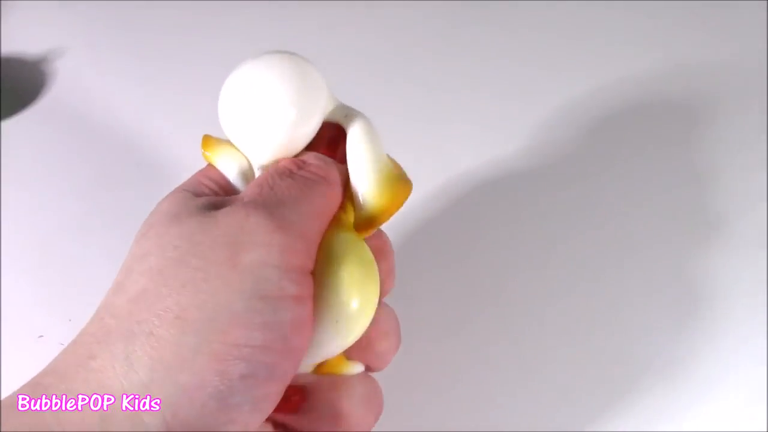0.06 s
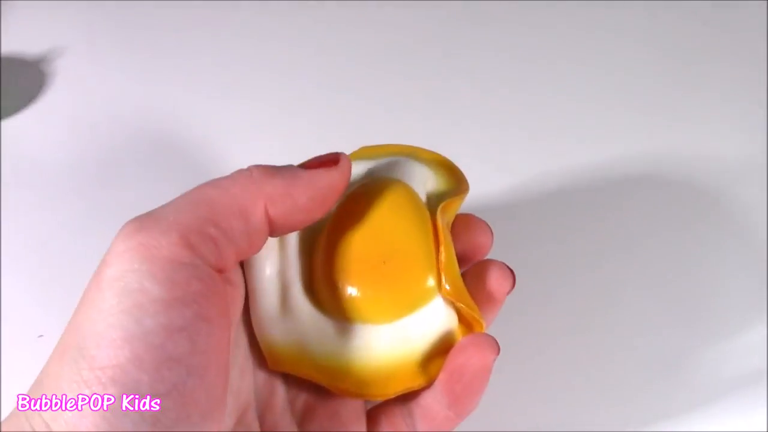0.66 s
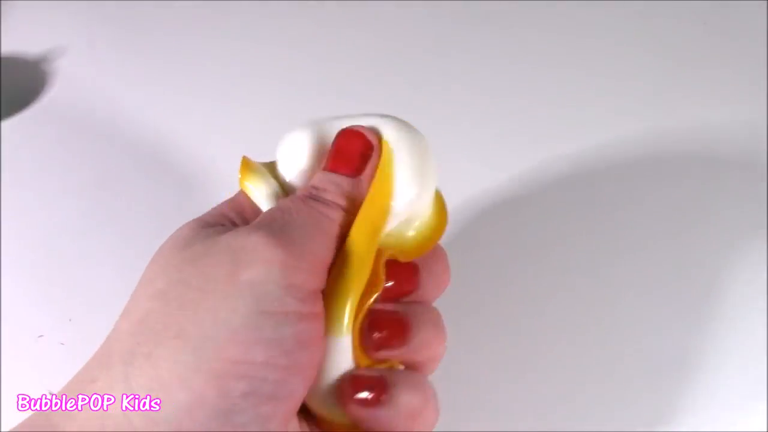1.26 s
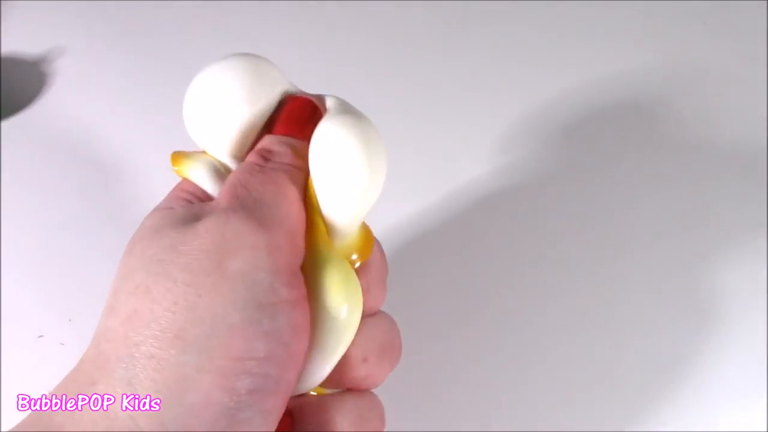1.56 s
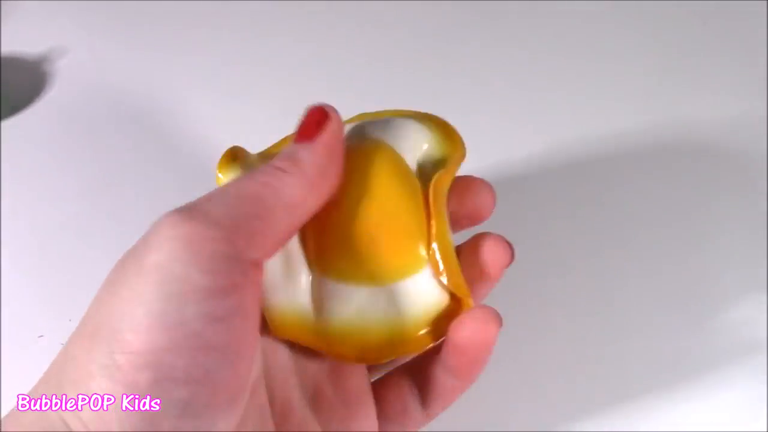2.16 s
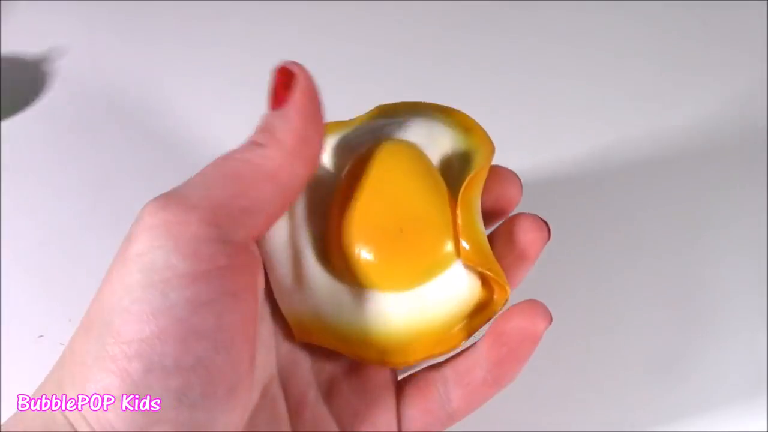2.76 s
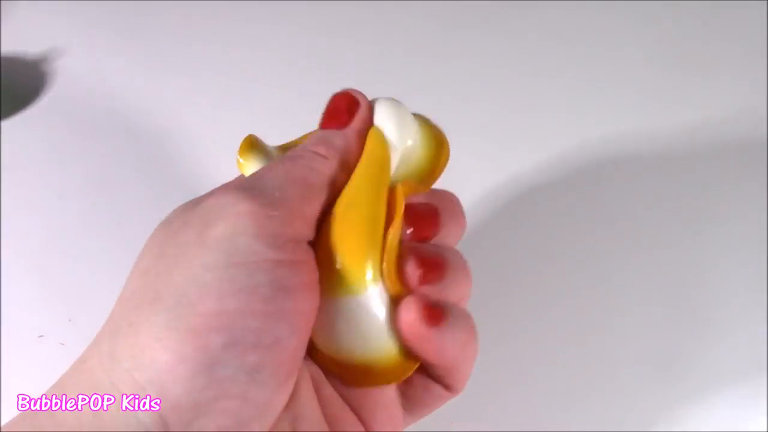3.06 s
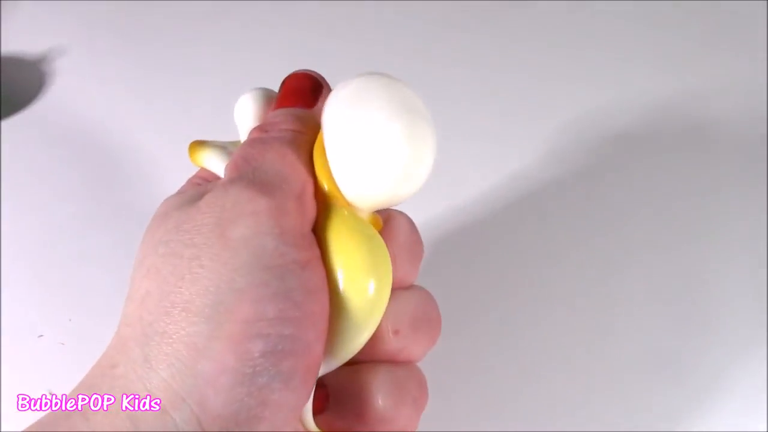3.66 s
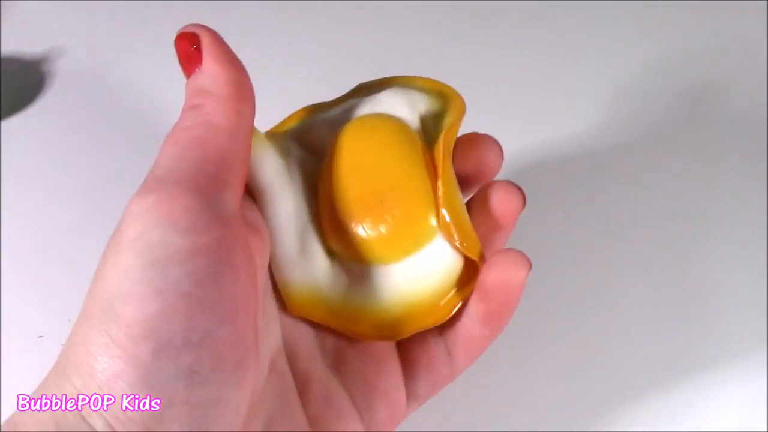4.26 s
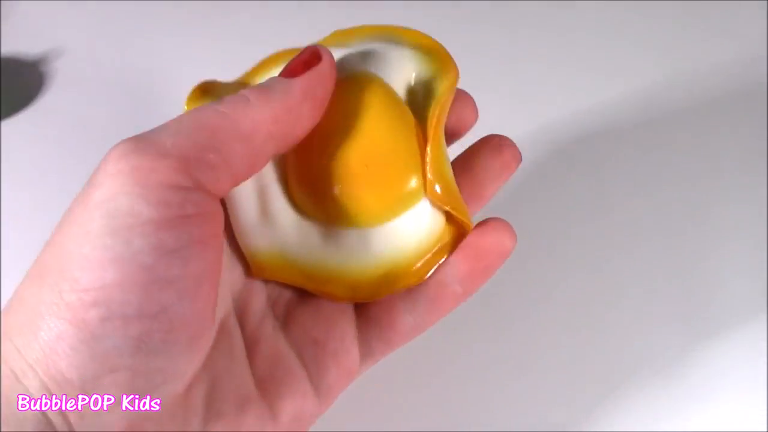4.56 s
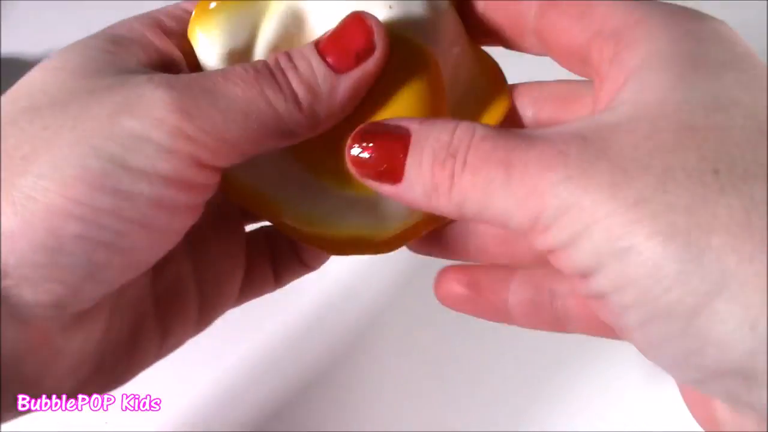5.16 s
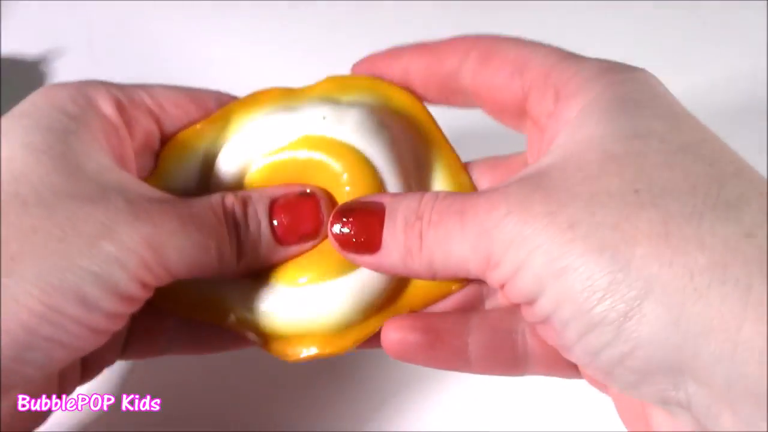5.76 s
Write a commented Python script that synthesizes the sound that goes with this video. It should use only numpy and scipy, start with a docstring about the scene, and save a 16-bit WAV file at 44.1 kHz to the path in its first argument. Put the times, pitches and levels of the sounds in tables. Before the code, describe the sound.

A hand squeezes a soft, goo-filled rubber toy close to the microphone in a small, lively room. It gives three short wet plops as the goo pushes into bulges, and two louder wet slaps as it springs back after the second and third squeezes. In between, the tacky rubber ticks and rubs faintly against the fingers. It ends with light sticky clicks and tiny bubble blips over quiet room tone.

```python
"""A small, live room: a goo-filled rubber toy is squeezed and let go by hand over a table.
On each squeeze the goo plops through into bulges of the skin; on release they slap back with a wet thud.
In between, the tacky rubber ticks and rubs against the fingers, creases crinkle, air bubbles blip
and goo fizzes faintly into a bulge. Dull hand rumble and a quiet room tone lie underneath."""
import sys
import numpy as np
from scipy import signal
from scipy.fft import rfft, irfft
from scipy.io import wavfile

SR = 44100
rng = np.random.default_rng(int(sys.argv[2]) if len(sys.argv) > 2 else 0)


def waveform_to_disk(signal):
    """Save audio, clipped to [-1, 1], as 16-bit WAV at the path in sys.argv[1]."""
    frames = np.transpose(np.atleast_2d(signal))
    scaled = np.clip(frames, -1, 1) * 32767
    samples = np.round(scaled).astype(np.int16)
    wavfile.write(sys.argv[1], SR, samples)


N = 261194
TIME = np.arange(N) / SR

# goo popping through into the bulges, the bulges slapping back, and a few sharp cracks of skin peeling loose
# (near 1.98, 1.99 and 2.51 s): # start_s, pocket_hz, pocket_db, pocket_length_s, snap_hz, snap_db,
# snap_length_s, room_send_db
GOO_POPS = [ (0.092, 496, -11.5, 0.0026, 970, -12, 0.0014, -4.5),
            (0.1406, 230.6, 2, 0.0024, 1510, 2.5, 0.00016, -3.5),
            (1.222, 535, -33.5, 0.0052, 1318, -14, 0.0005, -2.5),
            (1.2350, 557, -19.5, 0.0092, 920, -19.5, 0.0014, -1),
            (1.274, 686, -18, 0.0036, 464, -28.5, 0.0032, -5.5),
            (1.9823, 3108, -14, 0.0017, 860, -10, 0.00051, 2),
            (1.9894, 4384, 0.52, 0.0016, 1320, -12, 0.0013, -5),
            (2.0022, 297, 6, 0.0019, 1088, 5, 0.00048, -0.5),
            (2.5106, 327, -30.5, 0.0052, 3560, -24.5, 0.00072, -2),
            (3.0991, 570, -15, 0.0035, 1414, -13, 0.0017, -4),
            (3.1323, 783, -11, 0.0062, 565, -23, 0.006, -7.5),
            (3.937, 326, 4.5, 0.0022, 830, -3.5, 0.0026, -4),
            (3.948, 230, 6, 0.0034, 740, 5.5, 0.00052, -5), (3.9583, 280, 8, 0.0011, 1400, -5, 0.0007, 0),
            (3.9812, 223, -9, 0.0046, 603, -20, 0.0032, -6), ]
# tacky skin peeling off the fingers: start_s, level_db, pitch_hz, edge_db (relative to the tick)
PEEL_TICKS = [ (0.0712, -27, 3920, -5), (0.0935, -26, 2240, 8), (0.338, -35.5, 1350, -16),
              (0.389, -44, 1280, -14), (0.4348, -53.5, 4600, 14), (0.645, -43, 3850, -2),
              (0.9438, -37.5, 3650, -7), (1.235, -37, 3730, 4.5), (1.474, -45, 4300, -3),
              (1.926, -35, 3560, -4), (1.955, -36.5, 1700, -5.5), (2.167, -20, 1630, -8),
              (2.553, -36.5, 4780, 2), (2.843, -39.5, 3646, -25.5), (3.0994, -27.5, 3890, -3),
              (3.9304, -20.5, 3690, 5), (4.072, -25, 1370, 2), (4.102, -36.5, 4800, 0),
              (4.1479, -27, 1700, -8), (4.3432, -27, 3800, -2), (4.5968, -39, 2040, -13),
              (4.685, -40, 5400, 5.5), (4.9896, -35, 4000, -6), (4.994, -26, 3510, -13.5),
              (5.0945, -41.5, 1818, -19.5), (5.158, -42, 3150, 4), (5.1615, -40.5, 1095, -1),
              (5.2135, -36, 1533, 5), (5.218, -38, 1700, 7.5), (5.325, -38, 4050, 2.5),
              (5.482, -40, 1884, 2), (5.49, -48, 1870, 2), ]
# creases of the skin unfolding: start_s, end_s, level_db
CREASE_STROKES = [(0.2, 0.397, -59.5), (0.7, 0.84, -69), (2.06, 2.22, -56.5), (4.002, 4.048, -47.5),
                  (4.075, 4.233, -59.5), (4.42, 4.722, -65.5), (5.04, 5.381, -68)]
# small air bubbles in the goo: start_s, relative_db, pitch_hz
AIR_BUBBLES = [(1.773, -49, 1030), (3.776, -51, 1083), (3.873, -35.5, 810), (4.244, -43.5, 1112),
               (4.577, -48, 1040), (5.245, -45.5, 1060), (5.779, -47.5, 1040)]
# rubber sliding on the hand as the grip loosens: start_s, end_s, relative_db
RUB_STROKES = [(0.03, 0.06, -50.5), (0.097, 0.125, -38.5), (1.9, 1.975, -44), (2.565, 2.61, -55),
               (3.895, 3.922, -43), (4.5, 4.64, -66), (4.885, 4.905, -55), (5.26, 5.32, -65.5)]
# tone of rubber on skin: frequency_hz, gain_db
RUB_EQ = [(200, -28), (550, -0.5), (1100, -4), (1750, 1.5), (2400, -9), (3300, 1), (4000, -0.5),
          (4900, -5.5), (5800, -11), (7000, -13), (9500, -29.5)]
# goo seeping under a held grip, dying away as the pressure evens out: start_s, end_s, level_db
SEEP_STROKES = [(1.4, 1.45, -58), (1.65, 1.68, -74.5), (3.3, 3.4, -71.5)]
# resonances of a bulge's neck: pitch_hz, width_hz, gain_db
NECK_MODES = [(1750, 410, 3), (3500, 600, 5.5), (4200, 830, -8.5)]
# early reflections off the table top and near walls: delay_s, gain_db
EARLY_ECHOES = [(.0023, -12.5), (.0058, -18.5), (.0081, -15), (0.0139, -13.5), (0.0335, -30.5)]
# diffuse reverb tail: frequency_hz, gain_db, t60_s
ROOM_TAIL = [(80, -5, 0.6), (190, -7.5, 0.58), (320.5, -3, 0.7), (669.4, -2.5, 0.63), (1366, -6.5, 0.38),
             (2854, -5.5, 0.41), (4860, -11.5, 0.57), (8730, -0.5, 0.22)]
# standing waves that colour the tail: pitch_hz, width_hz, gain_db
STANDING_WAVES = [(127.7, 14, 13.5), (175, 17, 12), (226.8, 8.4, 5), (253, 25, 9.5), (341.6, 8, 5.5),
                  (437.5, 16, 7.5), (524, 26, 6.5), (562, 20, 8.5), (627.4, 3.8, 8.5), (746.4, 51, 2.5),
                  (809, 110, 2.5), (910, 44, -6.5), (946, 25, 6.5), (990, 18.43, 2.5), (1155, 20, 2.5),
                  (1470, 39, 8.5), (3504, 35, 1.5), (5140, 220, 8)]
# movements of the hand: start_s, end_s, relative_db
HAND_STROKES = [(1.23, 1.29, -43), (2.6, 2.78, -47.5), (2.87, 3.14, -53)]
# dull tone of the moving hand: frequency_hz, gain_db
HAND_EQ = [(50, 0), (90, 8.5), (140, 14.5), (220, -2.5), (450, -13), (900, -53)]
# steady rumble and hiss of the room: frequency_hz, gain_db
ROOM_TONE_EQ = [(20, -29), (40, -13), (75, 1), (110, -5), (150, -1), (250, -6), (480, -9.5), (740, -15),
                (1050, -18), (1600, -21.5), (3500, -26), (5600, -32), (7800, -39.5), (8600, -70.5)]
# stereo width of the room tone: frequency_hz, side_db (relative to the mid)
ROOM_TONE_WIDTH = [(30, -12), (120, -8.5), (500, -8), (2000, -8.5), (8000, -13.5)]


def from_db(db):
    """Decibels to gain."""
    return 10 ** (np.asarray(db) / 20)


def rms_one(x):
    """Scale to an rms of one."""
    return x / np.sqrt(np.mean(x ** 2) + 1e-20)


def at_hz(points, hz, column=1):
    """Read one column of a table on a log-frequency axis."""
    points = np.array(points)
    return np.interp(np.log(np.maximum(hz, 1)), np.log(points[:, 0]), points[:, column])


def butter(x, hz, kind, order=2):
    """Causal Butterworth filter."""
    sections = signal.butter(order, np.clip(hz, 10, .45 * SR), kind, fs=SR, output="sos")
    return signal.sosfilt(sections, x + 1e-18)


def equalise(x, curve):
    """Shape a track with an EQ curve."""
    return irfft(rfft(x) * from_db(at_hz(curve, np.fft.rfftfreq(N, 1 / SR))), N)


def add(track, start_s, sound):
    """Mix a sound into a track."""
    start = max(round(start_s * SR), 0)
    track[start:start + len(sound)] += sound[:len(track) - start]


def strokes(rows, swell_db_per_s, fade_db_per_s):
    """Envelope of a set of gestures: each swells, holds from start to end, and fades."""
    return sum(from_db(db - swell_db_per_s * np.maximum(start - TIME, 0)
                       - fade_db_per_s * np.maximum(TIME - end, 0)) for start, end, db in rows)


def blip(hz, length_s, onset_cycles, rise, size=4096):
    """A pocket or patch of skin rings briefly, bending up in pitch as it shrinks, and is choked."""
    age = TIME[:size] / length_s
    cycles = np.cumsum(hz * (1 + rise * np.minimum(age, 2))) / SR
    attack = 1 - np.exp(-cycles / onset_cycles)
    return attack * np.sin(2 * np.pi * cycles) * np.exp(-age ** 2)


def spray(t60_s, low_hz, high_hz, size=4096):
    """A wet film tears: a burst of noise that dies in milliseconds."""
    burst = rng.standard_normal(size) * from_db(-60 * TIME[:size] / t60_s)
    return butter(butter(burst, low_hz, "high", order=1), high_hz, "low", order=4)


def slips(per_s, spread_db):
    """Stick and slip: tiny clicks of uneven size at random moments."""
    sizes = from_db(spread_db * np.minimum(rng.exponential(1, N), 4)) * rng.standard_normal(N)
    return sizes * (rng.random(N) < per_s / SR)


def goo_pops(film_db=-25):
    """The skin snaps over, the pocket behind it rings, the wet film tears; gives direct and room send."""
    direct, send = np.zeros((2, N))
    for start_s, pocket_hz, pocket_db, pocket_s, snap_hz, snap_db, snap_s, send_db in GOO_POPS:
        # soft rubber passes little above a few times its own pitch
        pocket = butter(blip(pocket_hz, pocket_s, onset_cycles=0.24, rise=0.15), 2.0 * pocket_hz, "low")
        snap = butter(blip(snap_hz, snap_s, onset_cycles=0.15, rise=0.014), 2.6 * snap_hz, "low")
        film = from_db(film_db) * spray(t60_s=0.0048, low_hz=1900, high_hz=4830)
        pop = from_db(pocket_db) * pocket + from_db(snap_db) * (snap + film)
        add(direct, start_s, pop)
        add(send, start_s, from_db(send_db) * pop)
    return butter(np.array([direct, send]), 178, "high", order=3)


def peel_ticks(ring_cycles=2.83):
    """Each sticky spot lets go with a crisp edge and a ring; a small spot rings higher and dies sooner."""
    track = np.zeros(N)
    for start_s, db, hz, edge_db in PEEL_TICKS:
        edge = from_db(edge_db) * spray(t60_s=0.02, low_hz=2200, high_hz=5000)
        ring = blip(hz, ring_cycles / hz, onset_cycles=0.45, rise=0.012)
        add(track, start_s, from_db(db) * (ring + edge))
    return track


def crinkling(pitch_count=14, ring_cycles=2.0):
    """Creases come unstuck in scattered little snaps across a spread of bright pitches."""
    snaps = np.zeros(N)
    for hz in np.geomspace(1300, 6000, pitch_count):
        ring = blip(hz, ring_cycles / hz, onset_cycles=0.85, rise=0.02, size=512)
        snaps += signal.fftconvolve(slips(per_s=100, spread_db=-1.5), ring)[:N]
    return rms_one(snaps) * strokes(CREASE_STROKES, swell_db_per_s=619.5, fade_db_per_s=619)


def bubbles(trim_db=9.0):
    """Air trapped in the goo rings in soft, round blips."""
    track = np.zeros(N)
    for start_s, db, hz in AIR_BUBBLES:
        ring = blip(hz, length_s=0.0032, onset_cycles=1.9, rise=0.01)
        add(track, start_s, from_db(db + trim_db) * ring)
    return track


def rubbing(trim_db=-4.0, catch_hz=130, catch_depth_db=4.0):
    """Tacky rubber drags over the hand in little jerks, holding and giving by turns."""
    jitter = rms_one(butter(rng.standard_normal(N), catch_hz, "low"))
    catching = rms_one(from_db(catch_depth_db * np.clip(jitter, -2, 2)))
    drag = strokes(RUB_STROKES, swell_db_per_s=282, fade_db_per_s=497.5)
    friction = rms_one(equalise(slips(per_s=4000, spread_db=2.0), RUB_EQ))
    return from_db(trim_db) * drag * catching * friction


def seeping():
    """Goo fizzes through the narrow neck of a bulge."""
    fizz = slips(per_s=4300, spread_db=-0.5)
    neck = sum(from_db(db) * butter(fizz, [hz - width / 2, hz + width / 2], "band", order=1)
               for hz, width, db in NECK_MODES)
    flow = strokes(SEEP_STROKES, swell_db_per_s=70.5, fade_db_per_s=51.5)
    return flow * rms_one(butter(neck, 4800, "low", order=3))


def room_reverb(send, side_db=-13, build_s=0.0023, size=44100):
    """Table and walls answer with early echoes and a coloured tail, narrow in the stereo image."""
    t, early = TIME[:size], np.zeros(size)
    for delay_s, db in EARLY_ECHOES:
        add(early, delay_s, from_db([db]))
    early = butter(early, 6000, "low", order=1)
    bins_hz = np.fft.rfftfreq(size, 1 / SR)
    colour = 1 + sum((from_db(db) - 1) * np.exp(-(2 * (bins_hz - hz) / width) ** 2)
                     for hz, width, db in STANDING_WAVES)
    noise = irfft(rfft(rng.standard_normal((2, 2, size))) * colour, size)
    tail = np.zeros((2, size))   # mid, side
    edges_hz = 50 * 2 ** (np.arange(17) / 2)   # half-octave bands, each with its own decay
    for k, (low, high) in enumerate(zip(edges_hz, edges_hz[1:])):
        hz = np.sqrt(low * high)
        decay = from_db(-60 * t / at_hz(ROOM_TAIL, hz, column=2))
        band = butter(noise[k % 2], [low, high], "band") * decay * (1 - np.exp(-t / build_s))
        energy = np.sum(band ** 2, axis=1, keepdims=True)
        tail += from_db(at_hz(ROOM_TAIL, hz)) * band * np.sqrt(2 * (high - low) / SR / energy)
    mid = signal.fftconvolve(send, early + tail[0])[:N]
    side = from_db(side_db) * butter(signal.fftconvolve(send, tail[1])[:N], 700, "high", order=1)
    return np.array([mid + side, mid - side])


def hand_rumble(trim_db=-5.0):
    """The shifting hand makes dull, low swells of noise."""
    movement = strokes(HAND_STROKES, swell_db_per_s=450, fade_db_per_s=159.5)
    return from_db(trim_db) * movement * rms_one(equalise(rng.standard_normal(N), HAND_EQ))


def room_tone(mid_db=-55):
    """A steady bed of rumble and hiss, mostly in the centre."""
    mid, side = [rms_one(equalise(white, ROOM_TONE_EQ)) for white in rng.standard_normal((2, N))]
    side = equalise(side, ROOM_TONE_WIDTH)
    return from_db(mid_db) * np.array([mid + side, mid - side])


def scene(tick_send_db=-2.0, texture_send_db=-1.0):
    """The toy up close and centred, with the room around it."""
    pops, pop_send = goo_pops()
    ticks = peel_ticks()
    texture = crinkling() + bubbles() + rubbing() + seeping()
    send = pop_send + from_db(tick_send_db) * ticks + from_db(texture_send_db) * texture
    return pops + ticks + texture + room_reverb(send) + room_tone() + hand_rumble()


def record(dry, cutoff_hz=9500):
    """Peaks clip at full scale, then a steep low-pass takes off the top."""
    low_pass = signal.ellip(10, .1, 70, cutoff_hz, fs=SR, output="sos")
    return signal.sosfilt(low_pass, np.clip(dry, -1, 1))


dry = scene()
out = record(dry)
waveform_to_disk(out)
```